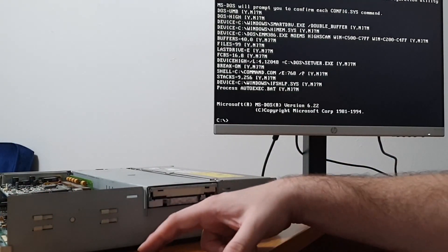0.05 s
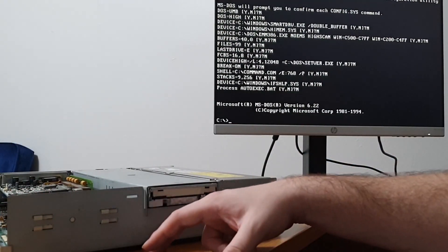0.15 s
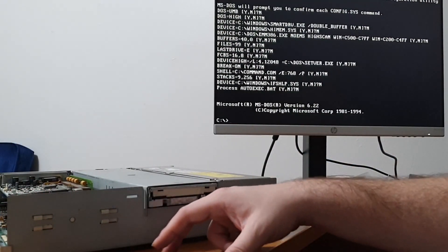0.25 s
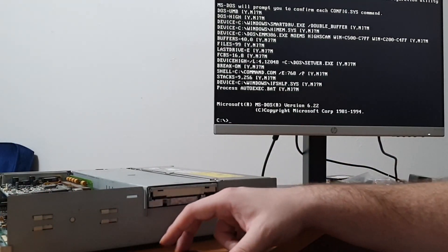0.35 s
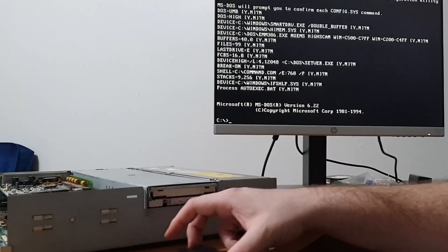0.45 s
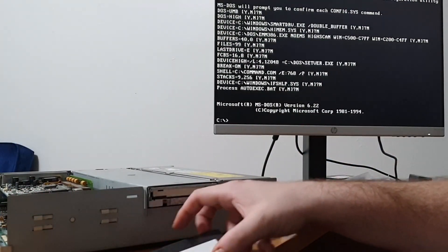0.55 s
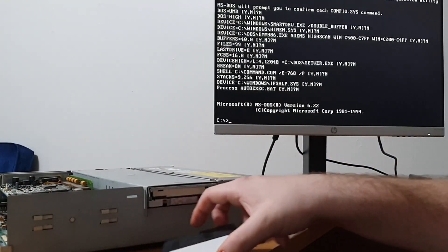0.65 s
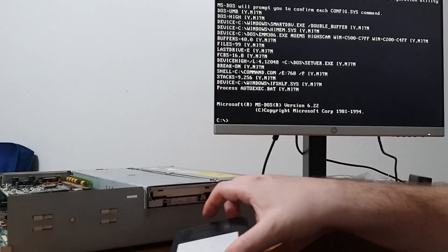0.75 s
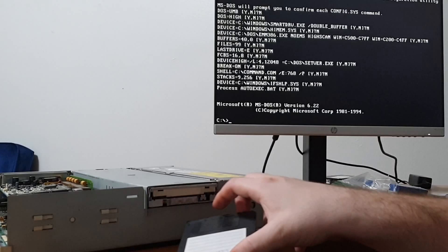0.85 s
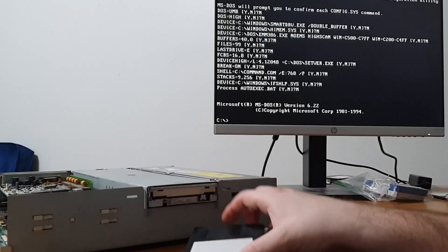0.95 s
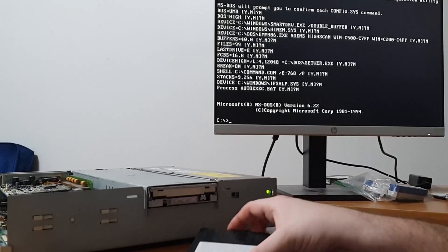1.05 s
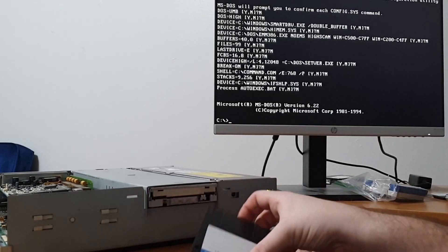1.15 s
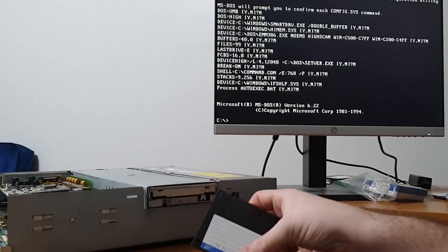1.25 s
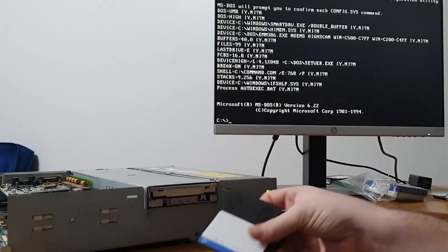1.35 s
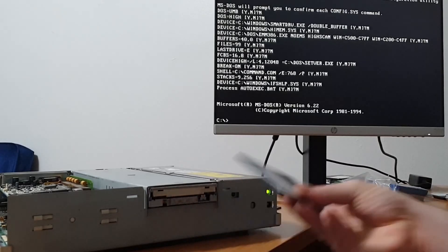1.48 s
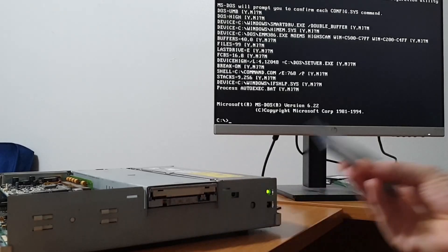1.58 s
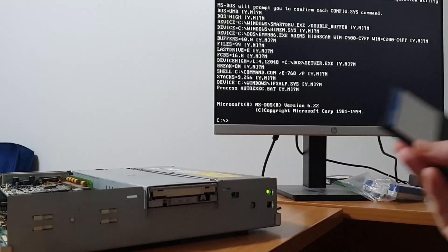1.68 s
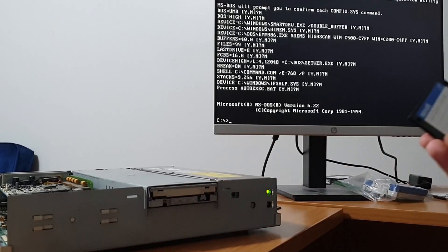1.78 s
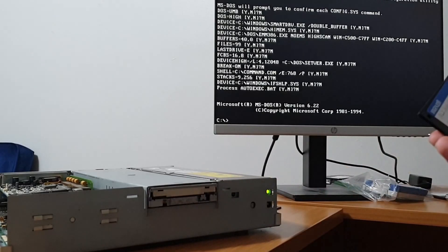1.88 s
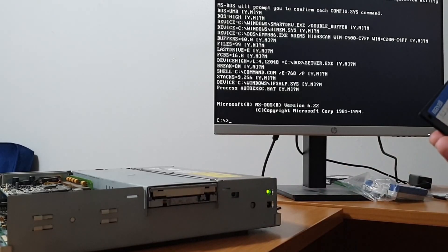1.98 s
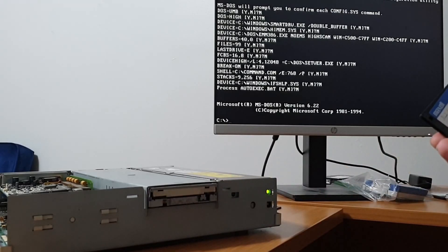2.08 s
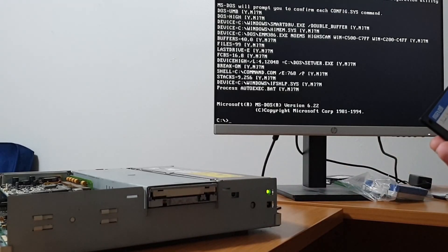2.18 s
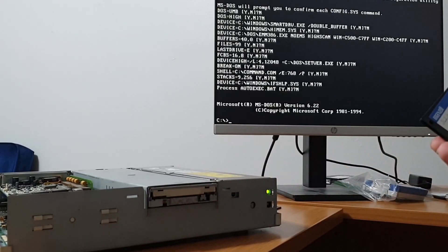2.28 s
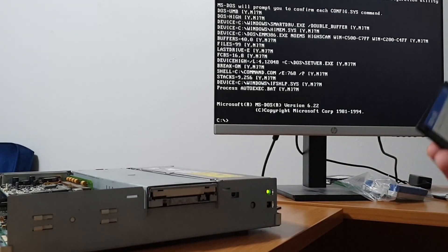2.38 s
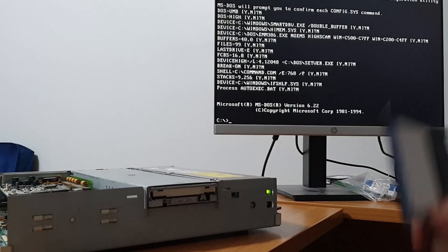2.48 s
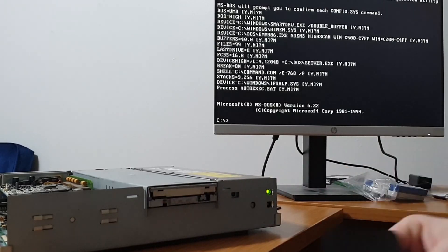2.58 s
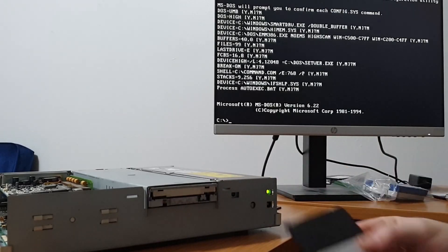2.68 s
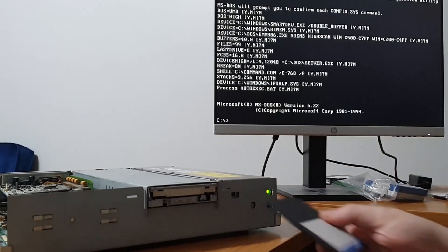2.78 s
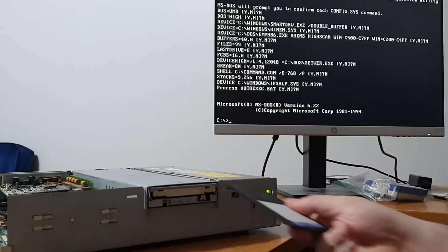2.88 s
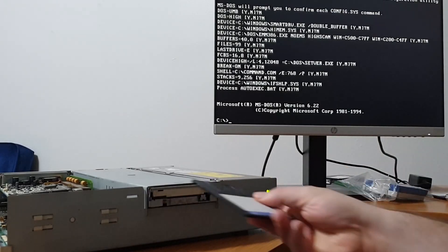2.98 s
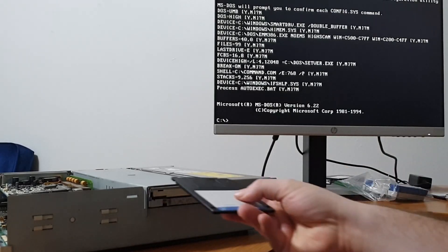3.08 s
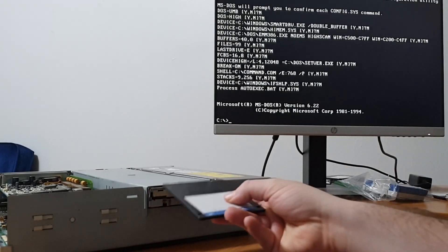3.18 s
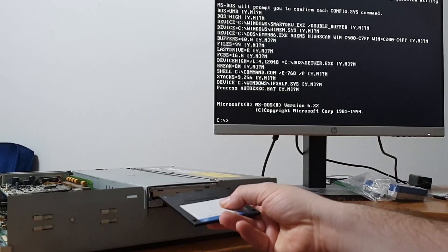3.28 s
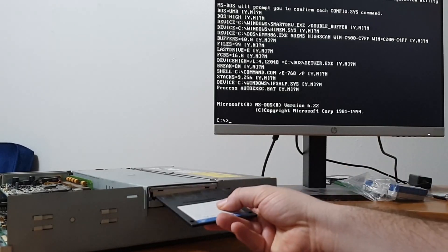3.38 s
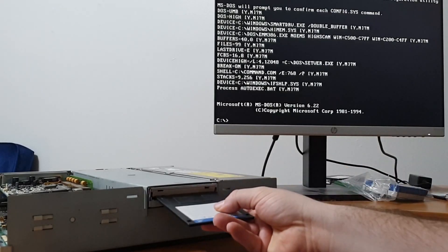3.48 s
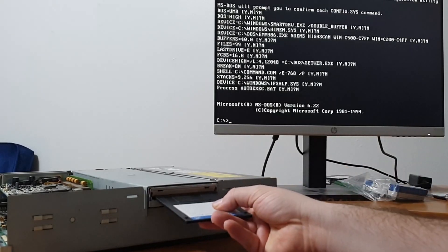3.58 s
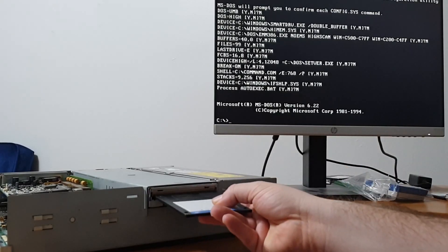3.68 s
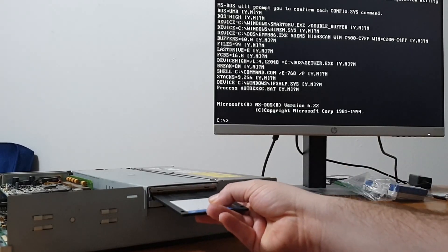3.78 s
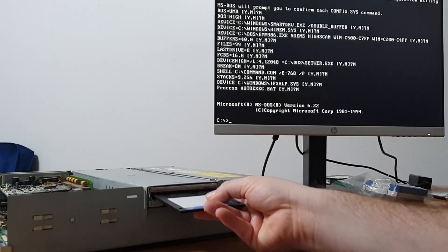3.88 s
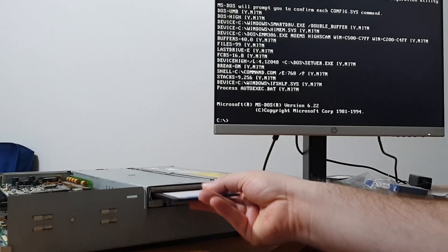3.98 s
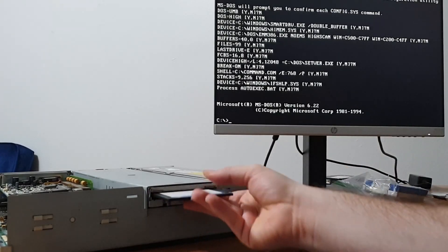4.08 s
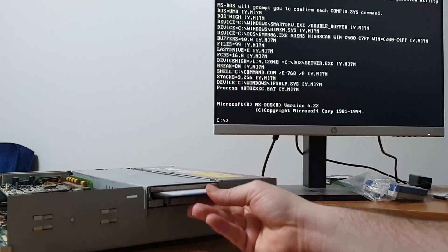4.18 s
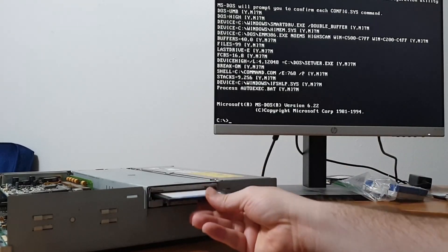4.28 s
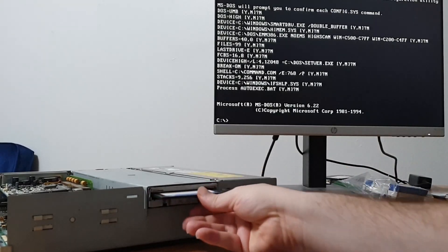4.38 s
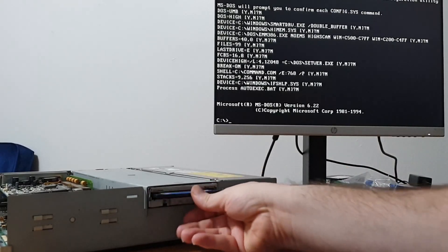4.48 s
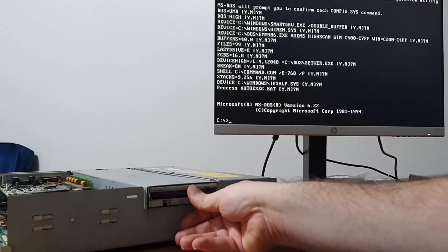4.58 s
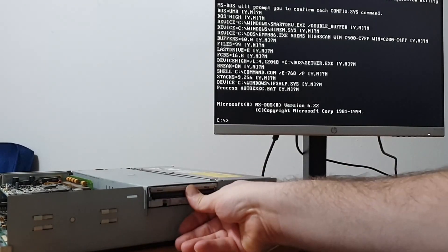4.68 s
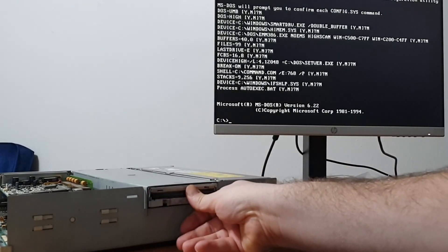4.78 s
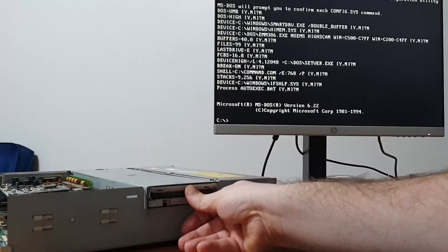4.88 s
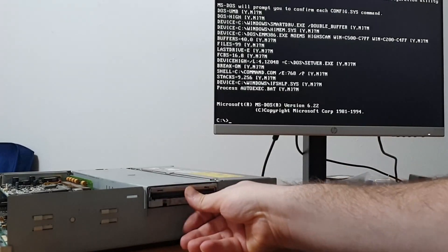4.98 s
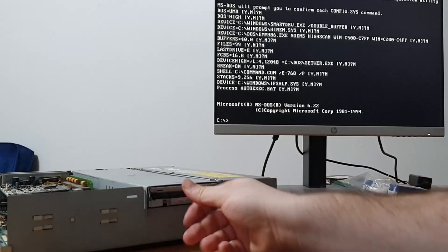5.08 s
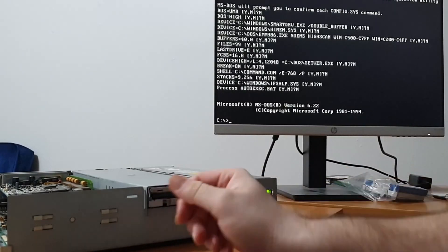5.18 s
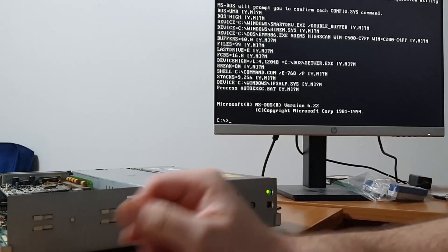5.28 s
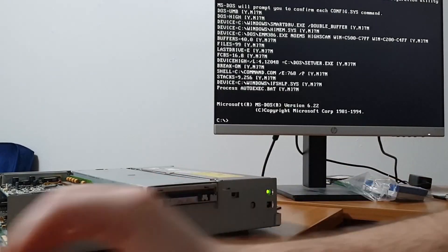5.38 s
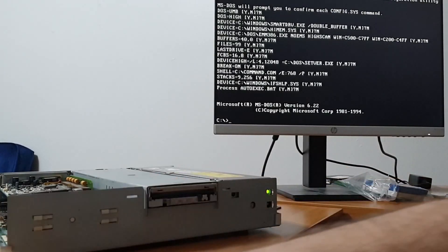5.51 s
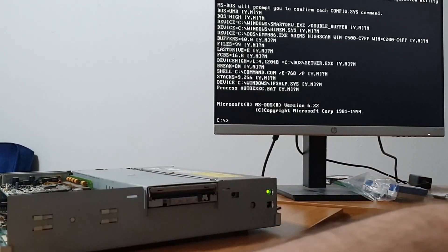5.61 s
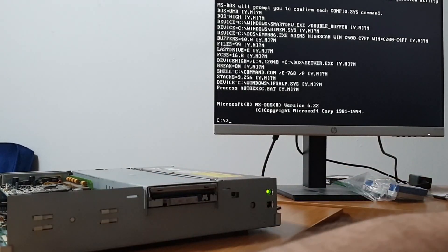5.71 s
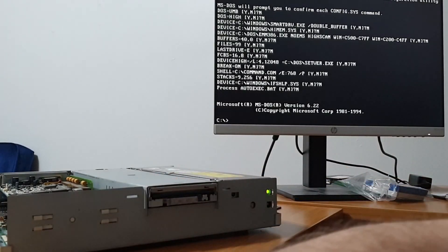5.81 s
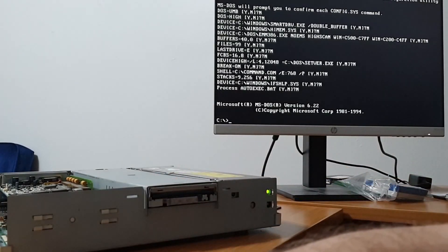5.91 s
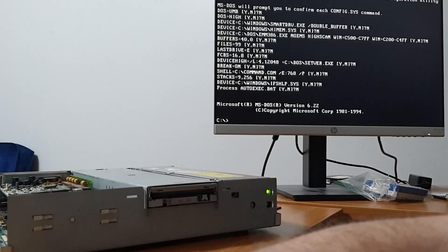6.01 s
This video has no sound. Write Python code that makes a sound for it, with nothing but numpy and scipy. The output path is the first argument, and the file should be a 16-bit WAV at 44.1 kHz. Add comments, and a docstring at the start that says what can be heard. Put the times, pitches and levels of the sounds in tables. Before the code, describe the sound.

Close in a small room, a computer's faint fan and disk whine runs throughout. A plastic disk scuffs and clacks off a wooden desk, then is turned almost silently in the fingers. It ticks and rubs into a drive slot with tiny squeaks, and the carrier snaps down in two bright metallic bursts. An arm then drags roughly along the desk edge, ending in plastic-like knocks.

```python
"""Wooden desk in a small room: a floppy disk is slid off it, turned over and pushed into an open computer's drive.
Shell, slot and desk ring as resonances driven by grainy friction noise; contacts are decaying noise puffs.
The drive's carrier snaps down in two clusters of steel blows; then the arm drags back along the desk edge,
stick-slip noise through board and box. Sines make the hard disk whine and fan tones, shaped noise the air."""
import sys
import numpy as np
from scipy import signal
from scipy.fft import rfft, irfft, next_fast_len
from scipy.io import wavfile
from scipy.ndimage import map_coordinates

SR = 44100
rng = np.random.default_rng(int(sys.argv[2]) if len(sys.argv) > 2 else 0)


def dump(signal):
    """Clip the signal to [-1, 1] and save it as 16-bit WAV at the path in sys.argv[1]."""
    limited = np.clip(np.atleast_2d(signal).T, -1, 1)
    pcm = np.round(limited * 32767).astype(np.int16)
    wavfile.write(sys.argv[1], SR, pcm)


N = 266805

# hollow of the drive slot: centre_hz, width_hz, level_db
SLOT_MODES = [(653, 73, 4), (987, 58, 9), (1225, 12, 5.5)]


def amp(db):
    """Amplitude ratio of a level in dB."""
    return 10 ** (np.asarray(db) / 20)


def unit(x):
    """Scale to rms 1."""
    return x / np.sqrt(np.mean(x ** 2) + 1e-20)


def along(points, hz):
    """Interpolate (Hz, value) points on a log-frequency axis."""
    f, v = np.transpose(points)
    return np.interp(np.log(hz + 1), np.log(f + 1), v)


def curves(rows):
    """One track per column after the time; the first, a level in dB, is silent outside the table."""
    s, level_db, *cols = np.transpose(rows)
    t = np.arange(N) / SR
    level_track = np.interp(t, s, level_db, -150, -150)
    return [level_track] + [np.interp(t, s, c) for c in cols]


def strokes(rows):
    """One gain track per level column; strokes rise, hold and fall linearly in dB and add in power."""
    t = np.arange(N) / SR
    power = 0
    for s, rise_s, hold_s, fall_s, *levels_db in rows:
        before = np.maximum((s - t) / max(rise_s, 1e-3), 0)
        after = np.maximum((t - s - hold_s) / max(fall_s, 1e-3), 0)
        stroke_db = np.array(levels_db)[:, None] - 10 * (before + after)
        power = power + amp(2 * stroke_db)
    return np.sqrt(power)


def wobble(rate_hz):
    """Smooth random curve, rate_hz knots a second."""
    knots = rng.standard_normal(int(N * rate_hz / SR) + 4)
    return map_coordinates(knots, [np.arange(N) * rate_hz / SR])


def filtered(x, response):
    """Multiply the spectrum of x by a complex response of frequency."""
    n = x.shape[-1]
    m = next_fast_len(n + 8192)
    return irfft(rfft(x, m) * response(np.fft.rfftfreq(m, 1 / SR)), m)[..., :n]


def modes(table):
    """Causal response of parallel resonances, alternating in sign."""
    def response(f):
        total = 0
        for k, (centre, width, db) in enumerate(table):
            total = total + (-1) ** k * amp(db) * 1j * f * width / (centre ** 2 - f * f + 1j * f * width)
        return total
    return response


def band(lo_hz, hi_hz):
    """Steep smooth band-pass."""
    return lambda f: 1 / np.sqrt((1 + (lo_hz / (f + 1)) ** 6) * (1 + (f / hi_hz) ** 6))


def noise(response, alike, lag=0., grit_db=0., grit_rate=300.):
    """Stereo noise of rms 1: alike is channel correlation, lag the right delay in samples, grit its graininess."""
    mid, side = rng.standard_normal((2, N)) * amp(grit_db * wobble(grit_rate))
    turn = np.arccos(np.clip(alike, -1, 1)) / 2
    left = np.cos(turn) * mid + np.sin(turn) * side
    right = np.cos(turn) * mid - np.sin(turn) * side
    late = lambda f: np.exp(1j * np.pi * f * np.array([[1], [-1]]) * lag / SR)
    return unit(filtered(np.array([left, right]), lambda f: response(f) * late(f)))


def add(track, s, sound, peak_db):
    """Mix a sound in at s seconds with this peak level."""
    track[..., round(s * SR):][..., :sound.shape[-1]] += amp(peak_db) * sound / np.abs(sound).max()


def hit(t60_s, response, pan_db, lag, wet_db):
    """A contact noise puff rings the object; the right lags by lag samples and the room adds a diffuse tail."""
    # room decay: freq_hz, t60_s
    room_t60 = [(200, 0.55), (2000, 0.26), (5000, .3), (14000, 0.16)]
    contact_s, gather_s = .0016, .003  # time constants: contact rise, reflections gathering
    t = np.arange(SR // 3) / SR
    decay = amp(-60 * t / max(t60_s, .002))
    puff = rng.standard_normal(len(t)) * decay * (1 - np.exp(-t / contact_s))
    side = np.array([[1], [-1]])
    delay = lambda f: np.exp(-2j * np.pi * f * (8 - side * lag / 2) / SR)
    direct = filtered(puff * amp(side * pan_db / 2), delay)
    hz, when, z = signal.stft(rng.standard_normal((2, len(t))), SR, nperseg=256)
    room_decay = amp(-60 * when / along(room_t60, hz)[:, None])
    tail = signal.istft(z * room_decay, SR, nperseg=256)[1][:, :len(t)]
    tail = tail * (1 - np.exp(-t / gather_s))
    wet = amp(wet_db) * tail * np.linalg.norm(puff) / np.linalg.norm(tail[0])
    return filtered(direct + wet, response)


def computer():
    """Shaped air noise plus motor harmonics and fan tones, each wavering in level and phase."""
    # fan and hard disk air: freq_hz, relative_density_db
    air_spectrum = [(150, -9), (250, 0.5), (538, -8.5), (775, -9), (890, -12.5), (1700, -13), (1820, -13.5),
                    (2240, -7.5), (2570, -9), (2960, 0), (4050, -17), (6590, -1), (7440, -8.5),
                    (8260, -29.5), (16000, -12)]
    # fan tones: freq_hz, level_db
    fan_tones = [(59, -78.5), (118.4, -67.5), (505, -81), (1674, -81.5), (1922, -86.5), (2309, -73),
                 (3079, -70), (3461, -77)]
    # audible multiples of the spin rate: order
    orders = (8, 10, 14, 16, 17, 18, 19, 20, 22)
    # levels of those multiples: level_db
    whine_db = [-77, -91.5, -96, -71.5, -80, -68, -80, -68.5, -84.5]
    spin_hz = 357.5  # motor commutation rate
    air = noise(lambda f: amp(along(air_spectrum, f)), alike=0.42, lag=3.94)
    out = amp(-58.5 + 0.81 * wobble(2.76)) * air
    t = np.arange(N) / SR
    whine = [(k * spin_hz, db) for k, db in zip(orders, whine_db)]
    for hz, db in whine + fan_tones:
        channel_phase = np.array([[0], [min(hz / 1500, 1.2)]])
        phase = 2 * np.pi * hz * t + 0.62 * wobble(6) + rng.uniform(0, 2 * np.pi) + channel_phase
        out += np.sqrt(2) * amp(db + 2.0 * wobble(4.89)) * np.sin(phase)
    return out


def desk():
    """A low shudder and a drumming panel swell and fade over a steady floor."""
    # swells of the low shudder and panel: peak_s, shudder_db, panel_db
    swells = [(0.0, -66, -55), (0.88, -70, -58.5), (1.43, -57.5, -77), (2.12, -56.5, -60), (2.49, -56, -86),
              (3.06, -58, -64.5), (3.5, -51, -59), (4.05, -50.5, -55.5), (4.3, -48, -59.5),
              (4.46, -48, -57.5), (4.6, -62, -47.5), (4.819, -43.5, -47.5), (5.192, -53.5, -57),
              (5.3, -44.5, -54.5), (5.6, -57, -46), (5.98, -47.5, -53)]
    # steady floor between swells: shudder_db, panel_db
    rest_db = (-64.5, -66)
    rise_s, fall_s = 0.17, 0.07  # per 10 dB
    low = noise(lambda f: band(53, 74)(f) ** 2, alike=0.81, grit_db=-2.0, grit_rate=14)
    panel_modes = modes([(130, 35, 0), (195, 50, -2)])
    panel = noise(lambda f: panel_modes(f) * band(95, 300)(f), alike=0.9)
    swelling = strokes([(s, rise_s, 0, fall_s, *db) for s, *db in swells])
    shudder, drumming = np.hypot(swelling, amp(rest_db)[:, None])
    return shudder * low + drumming * panel


def drag():
    """Skin sticks and slips on the board; each slip burst fades until the next, deeper as the arm slows."""
    # arm on the desk, brush then long drag: time_s, level_db, boom_rel_db
    path = [(5.1, -81, -3), (5.135, -60, -3), (5.186, -48.5, 0.5), (5.25, -56, 2), (5.31, -68, -2),
            (5.366, -46, -3), (5.5, -39.5, -6.5), (5.75, -43, 1.2), (5.96, -40, -3.5), (6.05, -56, 4)]
    # stick-slip rate: time_s, slips_per_s
    slip_rate = [(5.101, 42), (5.498, 44), (5.698, 30), (5.799, 25), (6.05, 12.5)]
    # scrape spectrum: freq_hz, relative_density_db
    scrape_spectrum = [(600, -15), (1100, -13), (1800, -4), (3290, 2), (4930, -13), (6300, -14),
                       (8000, -22.5), (10400, -56), (17600, -120)]
    # desk board: centre_hz, width_hz, level_db
    board_modes = [(411, 13.3, -2), (673, 45, 6), (1170, 400, -24)]
    # desk box: centre_hz, width_hz, level_db
    box_modes = [(225, 37, 0)]
    board_db, hiss_db = 1, -17  # over the scrape, hiss at the loudest point
    hiss_growth = 0.13  # extra dB of hiss per dB of scrape
    level_db, boom_db = curves(path)
    s, rate = np.transpose(slip_rate)
    rate = np.interp(np.arange(N) / SR, s, rate)
    cycle = (np.cumsum(rate) / SR + .35 + .08 * wobble(46)) % 1
    slip = unit(amp(-250 / rate * cycle))
    scrape = slip * noise(lambda f: amp(along(scrape_spectrum, f)), alike=0.057, lag=11.5,
                          grit_db=-0.5, grit_rate=300)
    board = noise(lambda f: modes(board_modes)(f) + amp(-5) * band(300, 1700)(f), alike=0.74, lag=9.6,
                  grit_db=1.0, grit_rate=42)
    boom = noise(lambda f: modes(box_modes)(f) * band(170, 450)(f), alike=0.96, grit_db=0.5, grit_rate=71)
    hiss = noise(band(9500, 11400), alike=0.13)
    hiss_gain = amp(hiss_db + hiss_growth * (level_db - level_db.max()))
    return amp(level_db) * (scrape + amp(board_db) * board + amp(boom_db) * boom + hiss_gain * hiss)


def fingers():
    """Soft swishes of skin over the smooth shell: band noise in hiss and shell ranges."""
    # skin shifting on the disk: peak_s, rise_s_per_10db, hold_s, fall_s_per_10db, hiss_db, shell_db
    swishes = [(1.085, .004, 0.0042, 0.053, -73, -54), (1.22, .02, .01, 0.093, -95, -56),
               (1.42, 0.17, 0.028, 0.069, -54, -64), (1.53, 0.022, 0.0013, 0.15, -52, -53),
               (2.66, 0.057, 0.047, 0.05, -54.5, -59), (2.79, 0.022, 0.0012, 0.046, -52, -64),
               (2.87, 0.0073, 0.046, 0.063, -57, -52), (3.09, 0.034, 0.009, 0.049, -50.5, -74)]
    on_hiss, on_shell = strokes(swishes)
    hiss = noise(band(2400, 13000), alike=0.16, lag=2.9, grit_db=1.5)
    shell = noise(band(1740, 6000), alike=0.059, grit_db=4.0)
    return on_hiss * hiss + on_shell * shell


def hollow(body):
    """Friction noise through the resonances of the body below the disk."""
    return noise(lambda f: modes(body)(f) + amp(-7.5) * band(400, 1500)(f), alike=0.29, lag=11,
                 grit_db=2.5, grit_rate=60)


def rub(table, body, below, hiss_db):
    """Grainy friction excites the shell, with hiss hiss_db relative to it, and the body below."""
    on_shell, on_hollow = strokes(table)
    shell = noise(lambda f: modes(body)(f) + amp(-6.5) * band(1400, 7000)(f), alike=0.099, lag=2.8,
                  grit_db=2.0, grit_rate=300)
    hiss = noise(band(10400, 12000), alike=0.28, lag=4.3, grit_db=1.5, grit_rate=600)
    return on_shell * (shell + amp(hiss_db) * hiss) + on_hollow * hollow(below)


def scuffs():
    """The disk scuffs the desk: friction rings the flat shell and the desk top."""
    # scuffs: peak_s, rise_s_per_10db, hold_s, fall_s_per_10db, shell_db, desk_top_db
    scuff_rows = [(0.0, .01, 0, 0.044, -34.5, -34.5), (0.25, 0.32, 0.026, 0.4, -53.5, -57.5),
                  (0.43, 0.037, 0.0046, 0.12, -49.5, -53), (0.585, 0.026, 0.1, 0.035, -50.5, -54.5),
                  (0.748, 0.024, 0.097, 0.04, -35.5, -55.5)]
    # shell lying flat: centre_hz, width_hz, level_db
    flat_shell = [(1880, 710, -2), (3120, 350, 7.5), (3800, 830, -9), (6060, 800, -1), (7500, 400, -12)]
    # desk top: centre_hz, width_hz, level_db
    desk_top = [(449, 26, -7), (1107, 42, 7), (1400, 24, -0.5)]
    return rub(scuff_rows, flat_shell, desk_top, hiss_db=-18.5)


def pushes():
    """The thumb pushes the disk along its guides: friction rings the held shell and the slot."""
    # pushes: peak_s, rise_s_per_10db, hold_s, fall_s_per_10db, shell_db, slot_db
    push_rows = [(3.57, .02, 0.042, 0.11, -48.5, -48.5), (3.855, 0.015, 0.0097, 0.089, -46, -48.5),
                 (4.1, 0.15, 0.081, 0.032, -46.5, -54), (4.28, 0.055, 0.01, .06, -46.5, -57),
                 (4.45, 0.14, 0.13, 0.081, -44.5, -44.5)]
    # shell held in the slot: centre_hz, width_hz, level_db
    held_shell = [(1630, 280, -3.5), (2190, 38, 7.5), (3040, 330, -0.5), (4530, 30, -26), (6900, 12, -23)]
    return rub(push_rows, held_shell, SLOT_MODES, hiss_db=-13.5)


def squeaks():
    """The shell binds in the slot: brief moans of narrow resonant noise."""
    # moans: start_s, length_s, pitch_hz, level_db
    moans = [(3.555, 0.03, 644, -50.5), (4.092, 0.025, 930, -52), (4.217, 0.064, 960, -56),
             (4.439, 0.015, 778, -44.5)]
    out = np.zeros((2, N))
    for s, length_s, hz, db in moans:
        swell = np.sin(np.linspace(0, np.pi, round(length_s * SR))) ** 0.66
        moan = filtered(rng.standard_normal(len(swell)), lambda f: modes([(hz, 90, 0)])(f) ** 2)
        out[:, round(s * SR):][:, :len(swell)] += amp(db) * swell * unit(moan)
    return out


def ticks():
    """Each plastic contact rings one spot of the shell and cracks in the treble; the landing hand booms the desk."""
    # plastic contacts: start_s, peak_db, crack_rel_ring_db, ring_hz
    contacts = [(0.0014, -26, -15, 2670), (0.5916, -30.5, -13, 3220), (0.6487, -32, -36, 2600),
                (0.736, -21, -17, 2610), (0.866, -11, -8.5, 1900), (0.978, -40, -6, 3100),
                (1.077, -29.5, -12, 2220), (2.707, -35, -8, 4670), (2.8652, -30.5, -15, 3060),
                (2.913, -33.5, -30, 2700), (3.484, -38, -28, 3450), (3.543, -33.5, -32, 3400),
                (3.6066, -25.5, -10, 3380), (3.6166, -30.5, -32, 3860), (3.7556, -28, -52, 3220),
                (3.8486, -25, -16, 3000), (3.896, -20.5, -14, 1960), (4.0986, -30, -21, 3000),
                (4.1545, -26.5, -26, 2070), (4.276, -24.5, -15, 2080), (4.348, -27.5, -21, 1860),
                (4.3598, -23.5, -22, 2140), (4.5366, -21.5, -37, 1630), (4.5586, -26.5, -34, 1860),
                (5.1812, -31.5, -36, 2450), (5.557, -35, -5, 5000), (5.8894, -22.5, -36, 4130),
                (5.897, -14, -10.5, 2380), (5.9255, -28.5, -36, 1970), (5.9504, -23.5, -37, 1980),
                (6.0091, -28, -9, 2730)]
    # hand landing on the desk: start_s, peak_db, t60_s
    thud = (0.0012, -38.5, 0.44)
    out = np.zeros((2, N + SR))
    for s, db, crack_db, ring_hz in contacts:
        ring = lambda f: modes([(ring_hz, 900, 0)])(f) ** 2 + amp(-10.5) * band(800, 6500)(f)
        body = lambda f: ring(f) + amp(crack_db) * band(5000, 17000)(f)
        add(out, s, hit(.014, body, pan_db=14, lag=4.16, wet_db=-0.5), db)
    s, db, t60_s = thud
    add(out, s, hit(t60_s, band(190, 265), pan_db=-2.0, lag=6.9, wet_db=-24), db)
    return out[:, :N]


def latch():
    """The spring-loaded carrier trips, drops and bounces: each blow rings plate, frame and a bright crack."""
    # carrier blows: start_s, peak_db, crack_db, frame_rel_plate_db
    blows = [(4.686, -20, -2, 6), (4.699, -8, -16, -8), (4.709, -11, -5, 9), (4.7133, -7.5, 12, 10),
             (4.718, -6.5, 4, 16), (4.7236, -23.5, 3, 1), (4.8235, -18, -12, -8), (4.83, -19.5, 17, 20.5),
             (4.8364, -1, -7.5, -8), (4.8388, -12, -3, 4.5), (4.851, -14, -30, -7)]
    # carrier plate: centre_hz, width_hz, level_db
    plate_modes = [(4400, 410, 4), (5280, 240, 6), (6000, 220, -4), (7100, 120, -21), (7360, 68, -12),
                   (9600, 100, -28), (11800, 59, -6)]
    # drive frame: centre_hz, width_hz, level_db
    frame_modes = [(1845, 200, -1), (2210, 54, 4), (2970, 190, 1)]
    plate_pan_db, crack_pan_db = -0.5, 1.5  # left over right, on top of the pan of the hit
    slot_db = -8  # slot ringing with the frame
    out = np.zeros((2, N + SR))
    plate = lambda f: modes(plate_modes)(f) + amp(-6.5) * band(3500, 8000)(f)
    frame = lambda f: modes(frame_modes)(f) + amp(-8) * band(1400, 3500)(f) + amp(slot_db) * modes(SLOT_MODES)(f)
    side = np.array([[.5], [-.5]])
    for s, db, crack_db, frame_db in blows:
        metal = lambda f: amp(side * plate_pan_db) * (plate(f) + amp(frame_db) * frame(f))
        crack = lambda f: amp(crack_db + side * crack_pan_db) * band(7500, 17000)(f)
        add(out, s, hit(.011, lambda f: metal(f) + crack(f), pan_db=6.5, lag=3.34, wet_db=-1.5), db)
    return out[:, :N]


def scene():
    """Sum all sources; friction, computer and desk lean left by 2.8 dB, the drag by 1.6 dB."""
    background = computer() + desk()
    disk = scuffs() + fingers() + pushes() + squeaks()
    panned = (background + disk) * amp([[1.4], [-1.4]])
    return panned + drag() * amp([[.8], [-.8]]) + ticks() + latch()


def record(dry):
    """Sharp band limit: nothing passes from 16 kHz up."""
    top_hz = 16000
    return filtered(dry, lambda hz: hz < top_hz)


dry = scene()
out = record(dry)
dump(out)
```